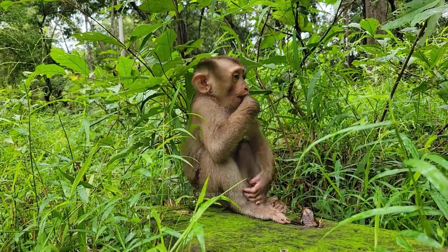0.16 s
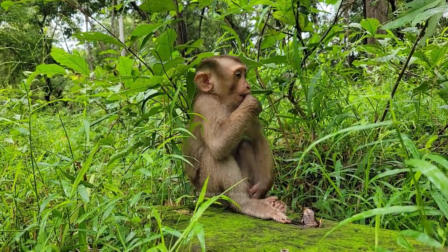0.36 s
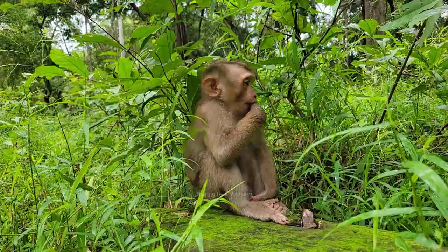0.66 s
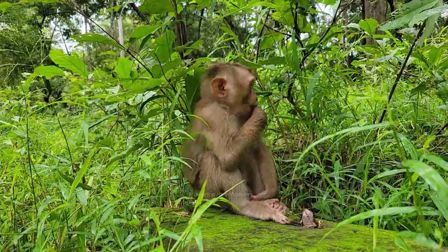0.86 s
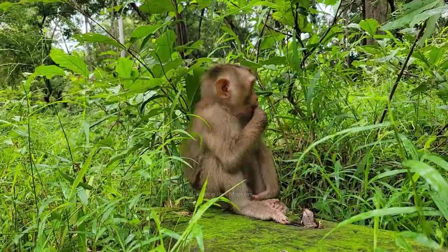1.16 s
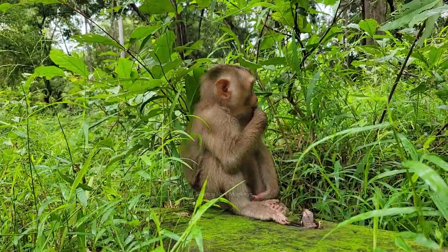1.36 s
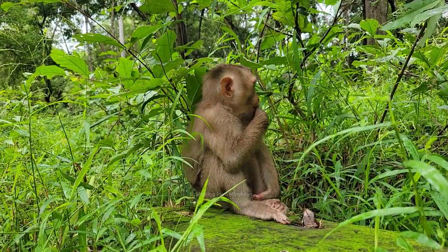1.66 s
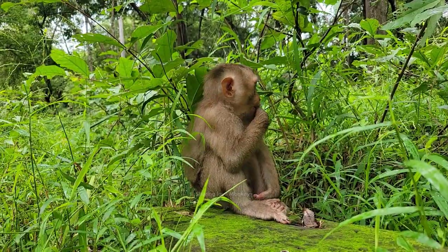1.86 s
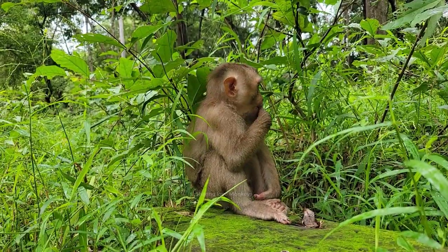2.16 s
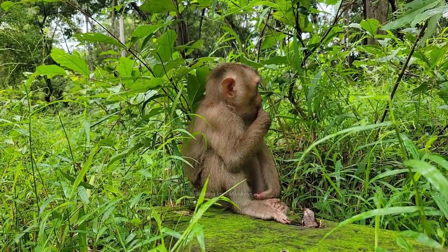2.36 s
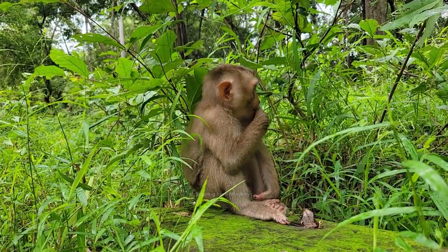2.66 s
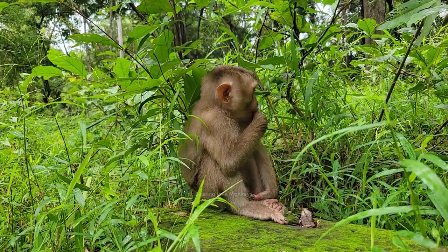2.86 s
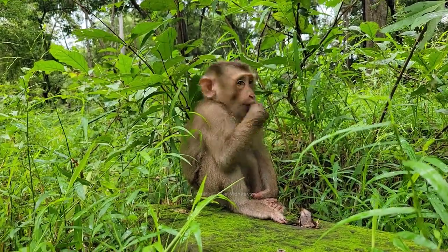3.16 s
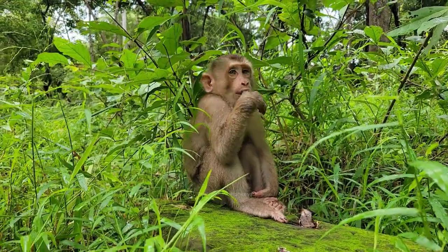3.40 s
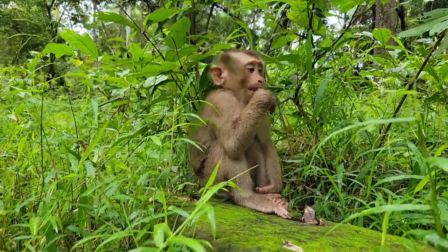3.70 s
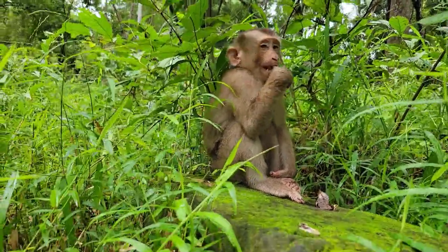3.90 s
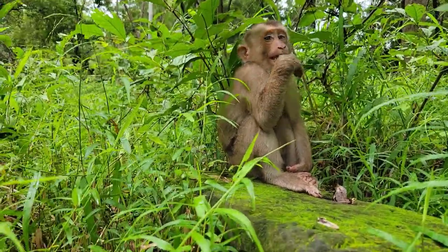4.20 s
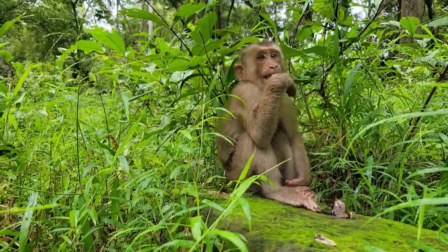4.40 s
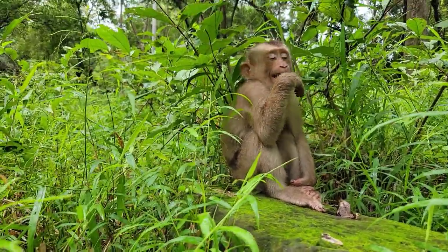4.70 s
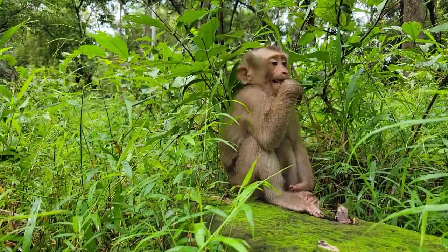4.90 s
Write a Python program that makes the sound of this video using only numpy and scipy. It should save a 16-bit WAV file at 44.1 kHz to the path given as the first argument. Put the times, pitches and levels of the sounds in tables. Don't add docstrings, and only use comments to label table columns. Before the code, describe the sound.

Two high monkey coos, a long quiet gap, then grass rustling and harsh squeaky barks in an insect-filled forest with low wind buffeting.

```python
import sys
import numpy as np
from scipy import signal
from scipy.fft import rfft, irfft
from scipy.io import wavfile
from scipy.ndimage import uniform_filter1d

SR = 44100
rng = np.random.default_rng(int(sys.argv[2]) if len(sys.argv) > 2 else 0)


def rack_gain(trim_db):
    fader = np.asarray(trim_db, float)
    return 10 ** (fader / 20)


def wav_out(sig):
    wavfile.write(sys.argv[1], SR, np.round(np.clip(np.atleast_2d(sig).T, -1, 1) * 32767).astype(np.int16))


N = 222396
TIME = np.arange(N) / SR
BINS = np.arange(N // 2 + 1) * SR / N + 1e-3
# [f/Hz, width/Hz, level/dB]
THROAT_LOW = [(1030, 210, 7), (1750, 270, -1), (3000, 810, -6), (3828, 110, 0)]
THROAT_HIGH = [(7650, 320, -3), (10140, 620, -4), (11840, 860, -11.5)]


def first_coo():
    # [t/s, pitch/Hz, level/dB, mouth opening as overtone level/dB, roughness/0-1, brightness/dB]
    coo = [
        (.138, 520.5, -46, -7.5, 0.6, -14),
        (.178, 553, -44, -1, 0.28, -4),
        (.215, 677, -41, -16.5, 0.24, -3.5),
        (.281, 1104, -38.5, -7, 0, -7.5),
        (.327, 1272, -41, 9.5, 0, -2),
        (.385, 1014, -33.5, -16, 0.15, 1),
        (.505, 888.4, -31, -27, 0.19, 6),
        (.56, 868, -38, -30, 0.22, 2.5),
        (.585, 805, -51, -30, 0, -9),
    ]
    # [f/Hz, width/Hz, level/dB]
    throat_mid = [(5300, 300, -3.5), (6170, 200, -10.5)]
    call = creak(.135) * voice(coo, high_db=-15.5, upper=throat_mid + THROAT_HIGH)
    return ports(call, lag=5.4, pan_db=11.5)


def second_coo():
    # [t/s, pitch/Hz, level/dB, mouth opening as overtone level/dB, roughness/0-1, brightness/dB]
    coo = [
        (1.857, 900, -57, -26.5, 0.3, -11),
        (1.868, 947, -40, -40.5, 0.13, -12.5),
        (1.925, 900, -38.5, -36, 0.18, -9.5),
        (2.03, 915, -32, -31, 0.17, 0.5),
        (2.155, 941.6, -38, -27.5, 0.12, 3.5),
        (2.18, 863, -42, -30, 0.1, -2),
        (2.203, 992, -44.5, -26, 0.1, -15),
        (2.22, 937, -49.5, -27, 0.084, -18),
        (2.234, 816, -66, -58, 0.26, -16),
    ]
    # [f/Hz, width/Hz, level/dB]
    throat_round = [(1850, 460, -2.5), (2800, 500, -8), (3680, 300, -18.5), (4730, 320, -10),
                    (5650, 270, -10.5)]
    round_high = [(8200, 230, -12), (9480, 360, -1.5), (10040, 310, -5)]
    call = voice(coo, high_db=-10.5, top_hz=10660, throat=throat_round, upper=round_high,
                 flicker_db=3.0, jitter=0.0049)
    return ports(call, lag=5.3, pan_db=12.0)


def grunt():
    # [t/s, pitch/Hz, level/dB, mouth opening as overtone level/dB, roughness/0-1]
    pitch_drop = [
        (3.291, 900, -46, -2, 0.76),
        (3.314, 726, -42, -3, 0.12),
        (3.321, 536, -46, 3.5, 0.72),
        (3.344, 577, -42.5, -1.5, 0.2),
        (3.362, 468, -61, -16, 0.77),
    ]
    # [f/Hz, width/Hz, level/dB]
    throat_grunt = [(1030, 210, 1.5), (1705, 330, 5), (3000, 560, -8.5), (4350, 460, -3.5),
                    (5200, 260, -23)]
    call = voice(pitch_drop, high_db=-3.5, throat=throat_grunt, flicker_db=4.0, jitter=0.0047)
    return ports(call, lag=6.3, pan_db=8.0)


def barks():
    starts = [3.291, 3.558, 3.856, 4.143, 4.458, 4.478, 4.761, 3.872, 3.832, 3.586, 3.64, 4.49, 4.455,
              4.137, .137]
    # [strongest t/s, end t/s, throat level/dB]
    pushes = [(3.31, 3.307, -49.5), (3.601, 3.7065, -27.5), (3.868, 3.905, -43), (4.172, 4.255, -23.5),
              (4.483, 4.526, -24.5), (4.503, 4.55, -20.5), (4.78, 4.86, -25.5), (3.9, 3.95, -37.5),
              (3.852, 3.87, -62), (3.602, 3.63, -28.5), (3.678, 3.72, -47.5), (4.501, 4.535, -38),
              (4.463, 4.476, -45.5), (4.15, 4.18, -49.5), (.172, 0.21, -56.5)]
    # [chest level/dB, nose level/dB, hiss level/dB]
    mixes = [(-12, 0, -2), (-8, -17.5, -19), (-31, 15.5, 17), (-28, -18.5, -26), (-35, -10.5, -9.5),
             (-50.5, -11, -23), (-28.5, -10.5, -16), (-46, -8.5, -15.5), (-11, 12, 15), (-36, -14, -15),
             (-30, -12.5, -1.5), (-40.5, 10, 3), (-30, 12.5, 18.5), (-27.5, 3.5, -11), (-45, -24.5, -39.5)]
    # [f/Hz, width/Hz, level/dB]
    mouths = [
        [(2496, 280, -3), (3820, 450, -36.5), (4370, 110, 13)],
        [(900, 2300, 9), (1540, 990, 25.5), (3540, 810, 1), (6420, 280, 15)],
        [(1826, 250, 5), (2640, 520, -1), (5300, 1100, 1), (6170, 470, 7.5), (6680, 460, -19.5)],
        [(1150, 92, -13), (1800, 300, 0.5), (2120, 220, -5), (2786, 140, -4), (4820, 390, -11),
         (6760, 230, -18)],
        [(2670, 50, 8.5), (3330, 320, 2.5), (6300, 230, 3), (7240, 71, 1.5)],
        [(1162, 64, -5), (1614, 170, -11.5), (2854, 200, 7), (3376, 160, 7), (4780, 290, -1), (6420, 100, 12),
         (6700, 80, 7.5)],
        [(1900, 418, 3), (2740, 100, 13), (3500, 230, -3), (6220, 560, 2.5), (7040, 610, -3.5)],
        [(1800, 140, 7), (2700, 480, 3.5), (3500, 300, 6), (7250, 550, 0)],
        [(3000, 900, 0.5), (6500, 1500, -7.5)],
        [(3500, 490, 3), (6650, 600, 0)],
        [(1200, 900, -1), (3970, 700, 2), (8870, 700, 3.5)],
        [(1200, 200, 2.5), (2800, 390, 5.5), (6500, 370, 7.5), (9060, 350, -6)],
        [(3000, 900, -3), (6300, 1300, 8), (9100, 500, 0)],
        [(2000, 600, 0), (5000, 250, 10)],
        [(1090, 200, 4.5), (1730, 250, 10.5), (3856, 300, -7), (7700, 270, -6)],
    ]
    # [right port lag/samples, treble left over right/dB, valley between resonances/dB, hoarseness/dB]
    places = [(7.7, 13, -7, 5), (11.7, 8.5, 3, 4), (5.13, 10, -28, 1), (5.4, 7.5, -13.5, 1.5),
              (4.7, 8, -18.5, 1.5), (4.4, 9, -38.5, 0.5), (4.76, 8.5, -10.5, 2.5), (3.9, 10, -31.5, 3.5),
              (5.1, 8, -9, 1.5), (9.2, 3.5, -11, 1), (8.2, 6.5, -11, 0.5), (5, 11.5, -19.5, 1),
              (5, 11, -10.5, 2), (5.5, 9, -16, 1.5), (4.1, 13.5, -16.5, 3)]
    out = 0
    for start, row, mix, mouth, place in zip(starts, pushes, mixes, mouths, places):
        lag, pan_db, valley_db, hoarse_db = place
        out = out + ports(bark((start, *row), mix, mouth, valley_db, hoarse_db), lag, pan_db)
    return out


def bark(row, mix, mouth, valley_db, hoarse_db):
    # [top as share of the rise/0-1, start under top/dB, loss by the end/dB,
    # curve of the fall/power, burst level/dB]
    paths = [(0.98, 23.5, 30.5, 1.5, -10.5), (0.83, 18.5, 52.5, 2.17, -6.5), (0.71, 18.5, 43.5, 2.2, 13),
             (0.13, 8.5, 40.5, 2.84, 3)]
    # [f/Hz, level/dB]
    hiss_tone = [(4710, -37), (8000, -14.5), (8480, -18.5), (9170, 13), (10200, 3), (14600, 10.5),
                 (16000, -26)]
    start, _, end, _ = row
    gate = uniform_filter1d(*curves([[start], [end]]), size=30)
    levels_db = [db + push(row, *path) for db, path in zip((mix[0], 0, *mix[1:]), paths)]
    colour = np.sqrt(rack_gain(2 * valley_db) + sum((rack_gain(db) * peak(hz, w)) ** 2 for hz, w, db in mouth))
    spurts = rfft(rng.standard_normal(N) * rack_gain(hoarse_db * walk(350)))
    chest = band(98, 482)
    throat = colour * band(670, 4200)
    nose = colour * band(4700, 8200)
    hiss = rack_gain(shape_db(hiss_tone, BINS)) * band(11000, 15000)
    filters = (chest, throat, nose, hiss)
    return gate * sum(rack_gain(db) * unit(irfft(spurts * g, N)) for db, g in zip(levels_db, filters))


def push(row, share, start_db, lost_db, bend, burst_db):
    start, top, end, db = row
    top = start + share * (top - start)
    burst_s = 0.0057
    burst = burst_db * np.exp(-(np.maximum(TIME - start, 0) / burst_s) ** 2)
    rise = start_db * np.clip((top - TIME) / (top - start), 0, 1)
    fall = lost_db * np.clip((TIME - top) / (end - top), 0, 1) ** bend
    return db + burst - rise - fall


def yelps():
    # [t/s, length/s, first pitch/Hz, last pitch/Hz, top level/dB]
    glides = [
        (3.556, 0.013, 1125, 1072, -42),
        (3.571, 0.018, 866, 833, -35.5),
        (4.185, 0.055, 930, 900, -43),
        (4.792, 0.0246, 901, 918, -38.5),
    ]
    # mouth opening in dB, roughness
    calls = [glide(row, 5.7, .42, edge_db=6.5) for row in glides]
    return ports(sum(voice(call, high_db=-13.5, jitter=0.0089) for call in calls), lag=6.3, pan_db=8.0)


def squeaks():
    # [t/s, length/s, first pitch/Hz, last pitch/Hz, top level/dB]
    tight = [(3.537, 0.011, 5800, 4400, -46), (3.884, 0.03, 4500, 3300, -37.5),
             (4.134, 0.013, 6500, 5000, -41), (4.46, 0.066, 2650, 2865, -20.5),
             (4.504, 0.049, 3114, 3020, -30.5), (4.544, 0.05, 3128, 3160, -48.5),
             (2.67, 0.124, 2150, 2330, -75), (3.893, .016, 8000, 7100, -40),
             (3.873, 0.021, 3000, 2450, -37.5), (3.898, .017, 2900, 2400, -37),
             (4.138, .05, 5100, 4850, -37), (4.157, 0.048, 1950, 1780, -25.5),
             (4.184, .042, 2740, 2790, -29.5), (4.513, 0.025, 6500, 6100, -33),
             (4.488, .022, 6600, 6900, -29), (4.175, .05, 6450, 6550, -45.5),
             (3.856, 0.035, 6500, 6350, -33)]
    rising = [
        (3.821, .038, 5850, 7250, -36),
        (3.831, .032, 12500, 14400, -25),
    ]
    octave_db = -30
    calls = [glide(row, octave_db, top=0.47, edge_db=19.5) for row in tight]
    calls += [glide(row, octave_db, top=.6, reach=.9, edge_db=15) for row in rising]
    return ports(sum(squeak(call) for call in calls), lag=6.5, pan_db=14.5)


def squeak(call):
    hz, db, octave_db, gate = curves(call)
    phase = 2 * np.pi * np.cumsum(hz * (1 + 0.0046 * walk(580))) / SR
    return gate * rack_gain(db + 1.3 * walk(200)) * (np.sin(phase) + rack_gain(octave_db) * np.sin(2 * phase))


def snaps():
    # [t/s, centre f/Hz, peak level/dB, t60/s]
    rings = [(1.434, 1520, -58, 0.0065), (4.869, 5430, -51, 0.0079), (2.989, 480, -61, .03),
             (3.0, 900, -63, 0.033), (3.028, 12020, -39.5, 0.022), (3.14, 308, -59, .043),
             (3.144, 13500, -52, .01), (3.598, 71.3, -21.5, 0.087), (3.602, 1800, -23, .012),
             (3.603, 348, -25, .035), (3.605, 250, -30.5, 0.041), (3.619, 900, -26, .016),
             (3.637, 576, -20, 0.012), (3.671, 653, -30.5, 0.0088), (3.747, 13300, -43, 0.011),
             (3.819, 3500, -45, 0.007), (3.92, 800, -29.5, 0.018), (4.162, 2670, -23, .013),
             (4.165, 1850, -26, 0.036), (4.178, 1900, -36, .014), (4.777, 3000, -35, 0.015),
             (4.78, 2700, -41, 0.015), (4.783, 2830, -42, .008), (4.791, 2700, -41, .021),
             (4.866, 11820, -41.5, .014), (3.677, 12000, -40, .008), (3.692, 12300, -39.5, .01),
             (2.849, 12400, -55, .01), (3.045, 2700, -72, .015), (3.559, 6580, -37.5, 0.022),
             (3.637, 3160, -36, .008), (3.819, 12110, -55, .008), (3.56, 4480, -39.5, .015),
             (3.922, 1800, -38, 0.013), (3.922, 2900, -51, .01), (4.143, 1850, -29, .02),
             (3.898, 3500, -30, 0.018), (3.9, 1900, -31.5, 0.018), (3.908, 2000, -32, 0.016),
             (3.879, 2700, -33, .015), (.155, 1000, -47, .012), (.14, 1100, -56, 0.011)]
    thuds = [row for row in rings if 200 < row[1] < 740]
    clicks = [row for row in rings if not 200 < row[1] < 740]
    shadow_db = -6
    return ports(ticks(clicks), lag=6.5, pan_db=14.5) + ticks(thuds) * rack_gain([[3], [-6.5 + 2 * shadow_db]])


def ticks(rows):
    out = np.zeros(N)
    for s, hz, db, t60 in rows:
        age = np.maximum(TIME - s, 0)
        attack = np.minimum(age * hz / 0.46, 1)
        ring = (hz < 5000) * np.sin(2 * np.pi * hz * age) + 0.52 * noise(peak(hz, 0.052 * hz) ** 2)
        out += (TIME >= s) * rack_gain(db - 60 * age / t60) * attack * ring
    return out


def voice(call, high_db, jitter=0.0019, top_hz=12600, breath_db=-3.0, throat=THROAT_LOW, upper=THROAT_HIGH,
          flicker_db=4.5):
    # [f/Hz, width/Hz, level/dB]
    nose_dips = [(2500, 350, -12), (5780, 110, -16), (6480, 70, -12), (1440, 250, -3.5), (4750, 300, -5),
                 (6850, 300, -5)]
    hz, db, low_db, rough, *bright_db, gate = curves(call)
    high_db = high_db + sum(bright_db) + 0.7 * low_db + 8 * np.log2(hz / 950)
    on, wobble, rasp = gate > 0, walk(30), walk(160)

    def breath(modes):
        return irfft(rfft(rng.standard_normal(N)) * rack_gain(resonances_db(modes, BINS)), N)[on]

    hz, low_db, high_db, rough = hz[on], low_db[on], high_db[on], np.clip(rough[on], 0, 1)
    phase = 2 * np.pi * np.cumsum(hz * (1 + jitter * wobble[on])) / SR
    air = rack_gain(low_db) * breath(throat) + rack_gain(high_db) * breath(upper)
    tone = rough * rack_gain(breath_db) * (1 + np.cos(phase)) * air
    glide_blur = .022 * uniform_filter1d(np.abs(np.gradient(np.log(hz))) * SR, size=600)
    for k in range(1, 21):
        def shake(x, step):
            return np.roll(x, step * k)[on]

        gain = 1
        if k > 1:
            gain = rack_gain(low_db + resonances_db(throat, k * hz)) + rack_gain(high_db + resonances_db(upper, k * hz))
            gain = gain * (k * hz < SR / 2.5)
        strain = min(k / 6, 1) ** 2 * (high_db + 30) / 19 + (k - 1) * glide_blur
        uneven = rough ** (2 if k == 1 else 1) * (.5 + .16 * k)
        smear = np.clip(np.maximum(uneven, strain), 0, .97)
        flicker = rack_gain((.6 if k == 1 else flicker_db) * shake(wobble, 9001))
        line = np.sqrt(1 - smear ** 2) * flicker * np.sin(k * (phase + 0.31 * k))
        blur = shake(rasp, 7001) * np.sin(k * phase) + shake(rasp, 3001) * np.cos(k * phase)
        tone += gain * (line + smear * blur / np.sqrt(2))
    out = np.zeros(N)
    out[on] = np.sqrt(2) * tone
    nose = rack_gain(sum(dip * np.exp(-((BINS - f) / w) ** 2) for f, w, dip in nose_dips))
    return irfft(rfft(gate * rack_gain(db) * out) * nose / (1 + (BINS / top_hz) ** 40), N)


def creak(start):
    rate_hz, length_s, depth_db = 191.6, 0.031, 17
    age = TIME - start
    slap_db = depth_db * (.4 - (age * rate_hz) % 1)
    return uniform_filter1d(rack_gain(np.where(age < length_s, slap_db, 0)), size=50)


def glide(row, *steady, top=.5, reach=.5, edge_db=16):
    s, length, hz0, hz1, db = row
    points = ((0, 0, edge_db), (top, reach, 0), (1, 1, edge_db))
    return [(s + u * length, hz0 + v * (hz1 - hz0), db - under_db, *steady) for u, v, under_db in points]


def resonances_db(modes, hz):
    return 10 * np.log10(sum(rack_gain(2 * db) / (1 + ((hz - f) / (w / 2)) ** 2) ** 1.245 for f, w, db in modes))


def grass():
    # [t/s, level/dB]
    stir = [(2.62, -55), (2.74, -13), (3.19, -11.5), (3.27, -1), (3.48, -1.5), (3.54, 4), (3.74, 0),
            (3.82, 1.5), (3.96, -9), (4.05, -18.5), (4.13, -1.5), (4.29, -15.5), (4.44, -5), (4.59, -11),
            (4.665, -33.5), (4.75, -1.5), (4.89, -16.5), (5.04, -7)]
    # [level at full stir/dB, slope/dB per dB of stir]
    layers = [(-61, 1.73), (-61.5, 1.57), (-64.5, .5)]
    # [t/s, level/dB, half length/s]
    swishes = [(3.353, -64.5, 0.13), (3.777, -50, 0.041), (3.87, -64, 0.012), (4.015, -69.5, 0.066),
               (4.157, -50, 0.013), (4.32, -68.5, 0.03), (5.02, -65, 0.087)]
    # [t/s, half length/s, middle level change/dB, high level change/dB]
    brushes = [(2.85, 0.03, -3, 4.5), (2.997, 0.023, 8, 4.5), (3.087, .04, -12, -10),
               (3.204, 0.051, -3.5, -7.5), (3.404, 0.033, -2, -1.5), (4.4, 0.02, -3, -4.5),
               (3.722, 0.042, -6, 1), (4.702, 0.048, 6.5, -5)]
    stir_db, gate = curves(stir)
    low_db, mid_db, high_db = (db + slope * stir_db for db, slope in layers)
    swish = sum(rack_gain(db) * bump(s, half) for s, db, half in swishes) * noise(band(330, 470))
    mid_db = mid_db + 0.99 * walk(25) + sum(bump(s, half) * mid for s, half, mid, _ in brushes)
    high_db = high_db + sum(bump(s, half) * high for s, half, _, high in brushes)
    crackle = rack_gain(0.74 * walk(27) + 0.28 * walk(460))
    notches = (1 - .8 * peak(5750, 250) ** 2) * (1 - .7 * peak(6900, 350) ** 2)
    mid_tone = band(1500, 9000) / np.sqrt(BINS) * notches
    high_tone = band(9600, 15800) * (.2 + peak(13600, 3200) ** 2)

    def layer():
        low = rack_gain(low_db) * noise(band(220, 1300))
        return low + rack_gain(mid_db) * noise(mid_tone) + rack_gain(high_db) * noise(high_tone)

    shared = ports(layer() + swish, lag=10.81, pan_db=11.5)
    left, right = gate * crackle * (shared + np.array([layer(), layer()]))
    return np.array([left, irfft(rfft(right) / (1 + (BINS / 7000) ** 6), N)])


def trees(x):
    level_db, t60_s = -59, .9
    decay = rack_gain(level_db - 60 * TIME / t60_s) / np.sqrt(SR / 30) * (TIME > .015)
    tail = np.array([noise(peak(2900, 800) ** 2) * decay for _ in range(2)])
    return signal.fftconvolve(x[None], tail[:, :SR], axes=1)[:, :N]


def far_monkeys():
    # [t/s, length/s, first pitch/Hz, last pitch/Hz, top level/dB]
    far_calls = [
        (.79, 0.37, 880, 1166, -63),
        (.88, 0.28, 1780, 1960, -75.5),
        (1.58, 0.29, 800, 835, -71),
        (2.2, 0.43, 550, 551, -76),
        (4.931, 0.13, 1030, 1150, -59.5),
    ]
    far_hoots = [
        (1.259, 0.112, 257.4, 271.5, -99),
        (2.69, 0.16, 1118, 1150, -82.5),
    ]
    # mouth opening in dB, roughness
    calls = [glide(row, -20.5, 0.79, top=0.37, reach=0.78, edge_db=11) for row in far_calls]
    calls += [glide(row, 23.5, 0.12, edge_db=12.5) for row in far_hoots]
    far = sum(voice(call, high_db=-60, jitter=0.031, top_hz=2300) for call in calls)
    return ports(far, lag=22.0, pan_db=8.5)


def wind():
    # [t/s, level over the breeze/dB, half length/s]
    gusts = [(0.122, 10, 0.091), (0.36, 3, 0.042), (0.49, 9.5, 0.093), (1.263, 7, 0.41), (1.628, 5, 0.033),
             (1.892, -3.5, 0.41), (2.555, 13.5, 0.15), (2.62, -5, 0.078), (3.622, 19, 0.056),
             (3.726, 7.5, 0.069), (3.987, 6, 0.13), (4.249, -0.5, 0.13), (2.967, -4.5, 0.022),
             (2.25, 6.5, 0.13), (.12, -1.5, 0.29), (4.415, 7.5, 0.012), (4.569, 5, 0.15),
             (4.949, 10.5, 0.06)]
    # [f/Hz, level per Hz/dB]
    wind_tone = [(12, -29), (20, -26), (32, -5), (86, 1.5), (141, -8.5), (177, -23.5), (208, -20),
                 (245, -40), (269, -39), (500, -54.5), (650, -74), (1100, -120)]
    breeze_db = -54.5
    db = breeze_db + sum(gust_db * bump(s, half) for s, gust_db, half in gusts)
    pan_db = 4 + 1.3 * walk(0.77)
    tone = rack_gain(shape_db(wind_tone, BINS))
    both = noise(tone) * rack_gain(2.3 * walk(4.7))
    apart = noise(tone * peak(200, 400))
    rumble = rack_gain(db + np.array([pan_db, -pan_db]) / 2) * (both + 0.15 * np.array([apart, -apart]))
    return irfft(rfft(rumble) / np.sqrt(1 + (46 / BINS) ** 8), N)


def drone():
    hz = 2826 * np.exp(-.146 * TIME)
    level = (TIME < 4.7) * rack_gain(-58 - 11 * TIME)
    phase = 2 * np.pi * np.cumsum(hz) / SR
    tone = (0.24 + walk(50)) * np.sin(phase) + walk(45) * np.cos(phase)
    return ports(level * tone, lag=5.0, pan_db=4.0)


def crickets():
    # [f/Hz, width/Hz, level/dB, throb rate/Hz, throb depth/dB]
    singers = [(6750, 500, -77.5, 55, 2), (4900, 200, -86, 30, 1.5), (550, 25, -90, 3, 3),
               (2980, 120, -92, 1.5, 4)]
    out = 0
    for hz, width, db, rate, throb_db in singers:
        song = peak(hz, width) ** 2
        out = out + rack_gain(db + throb_db * walk(rate)) * np.array([0.731 * noise(song), 0.39 * noise(song)])
    return out


def forest():
    # [t/s, level/dB, half length/s]
    flutters = [(0.0, -69, 0.033), (0.126, -68, .03), (0.19, -68, .035), (0.645, -80, .02),
                (0.962, -74, 0.037), (1.187, -83, 0.017)]
    # [f/Hz, level per Hz/dB]
    hush_tone = [(150, -18.5), (250, 3), (446, -13.5), (571, -5), (986, -14.5), (2330, -12), (5690, -20.5),
                 (6820, -29), (8180, -37), (11200, -13), (13000, -33)]
    wings = band(12300, 14600) ** 3
    flutter = sum(rack_gain(db) * bump(s, half) for s, db, half in flutters)
    hush = rack_gain(shape_db(hush_tone, BINS)) * band(150, 9900)
    out = flutter * np.array([noise(wings), 0.28 * noise(wings)])
    return out + rack_gain(-73 + 0.34 * walk(2.1)) * np.array([0.8 * noise(hush), 0.79 * noise(hush)])


def ports(x, lag, pan_db):
    shadow_db = pan_db * (.45 + .55 * np.clip((BINS - 900) / 2000, 0, 1))
    late = np.exp(-2j * np.pi * BINS * lag / SR)
    return np.array([irfft(rfft(x) * g, N) for g in (rack_gain(shadow_db / 2), rack_gain(-shadow_db / 2) * late)])


def unit(x):
    return x / np.sqrt(np.mean(x ** 2))


def curves(table):
    s, *columns = np.transpose(table)
    gate = uniform_filter1d(1. * ((TIME > s[0]) & (TIME < s[-1])), size=160)
    return [np.interp(TIME, s, c) for c in columns] + [gate]


def bump(s, half):
    return np.exp(-((TIME - s) / half) ** 2)


def shape_db(points, hz):
    f, db = np.transpose(points)
    return np.interp(np.log(hz), np.log(f), db)


def noise(gain):
    return unit(irfft(rfft(rng.standard_normal(N)) * gain, N))


def band(lo_hz, hi_hz):
    return 1 / np.sqrt((1 + (lo_hz / BINS) ** 8) * (1 + (BINS / hi_hz) ** 8))


def peak(hz, width):
    return 1 / np.sqrt(1 + ((BINS - hz ** 2 / BINS) / width) ** 2)


def walk(rate):
    return noise(1 / (1 + (BINS / rate) ** 2))


def scene():
    near = first_coo() + second_coo() + grunt() + barks() + yelps() + squeaks() + snaps()
    return near + trees(near[0]) + grass() + far_monkeys() + wind() + drone() + crickets() + forest()


def low_pass(x):
    return signal.sosfilt(signal.butter(12, 16640, fs=SR, output="sos"), x)


def record(dry):
    ceiling, top_hz = .6, 15700
    rounded = ceiling * np.tanh(dry / ceiling)
    mix = irfft(rfft(rounded) / (1 + (BINS / top_hz) ** 60), N)
    return low_pass(mix)


dry = scene()
out = record(dry)
wav_out(out)
```